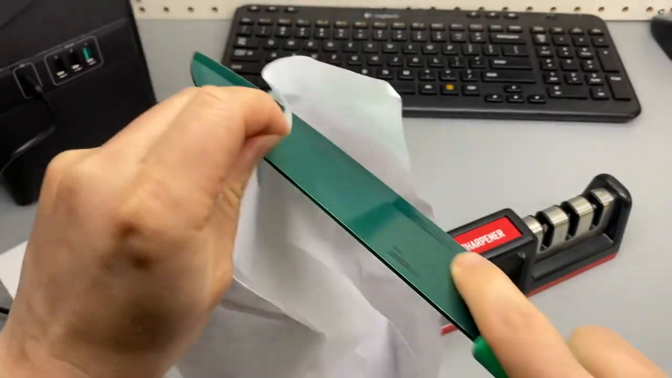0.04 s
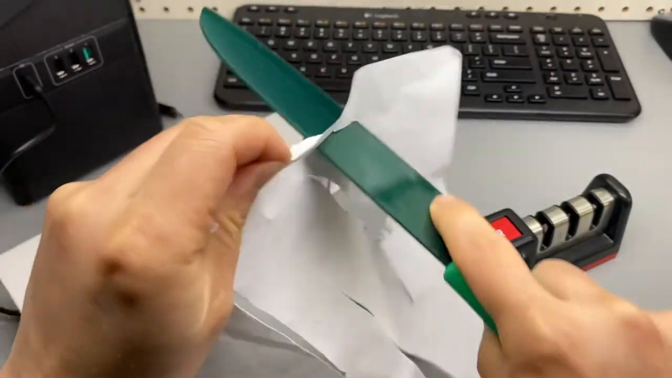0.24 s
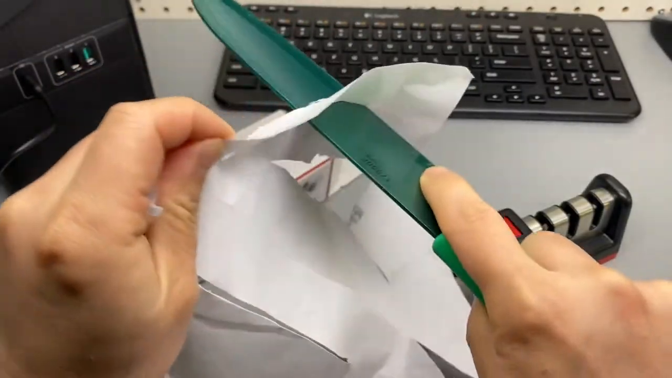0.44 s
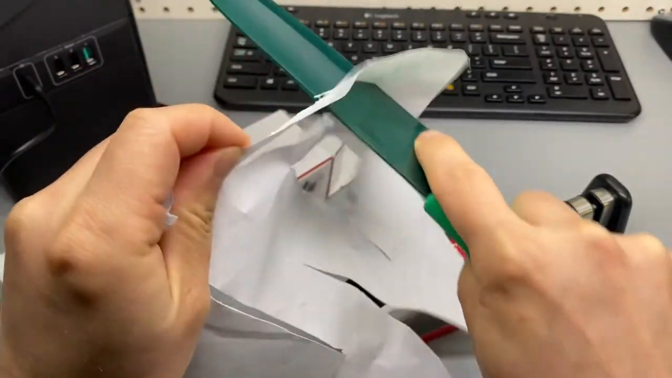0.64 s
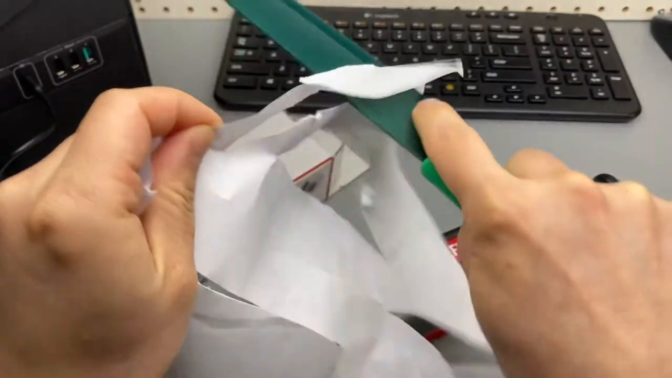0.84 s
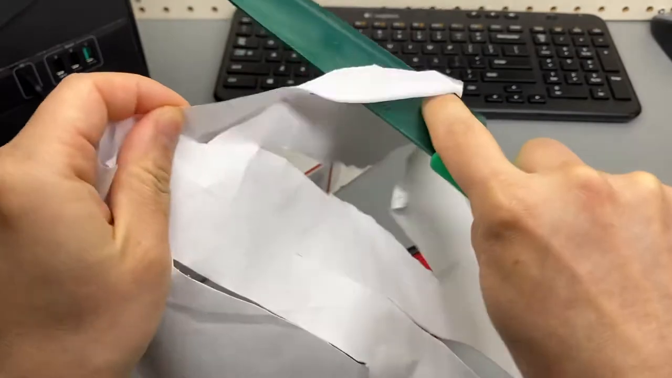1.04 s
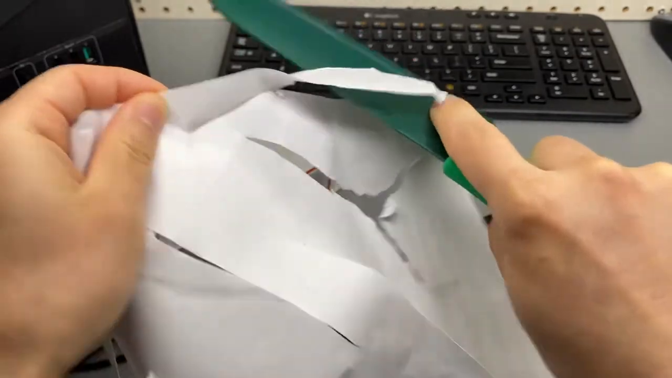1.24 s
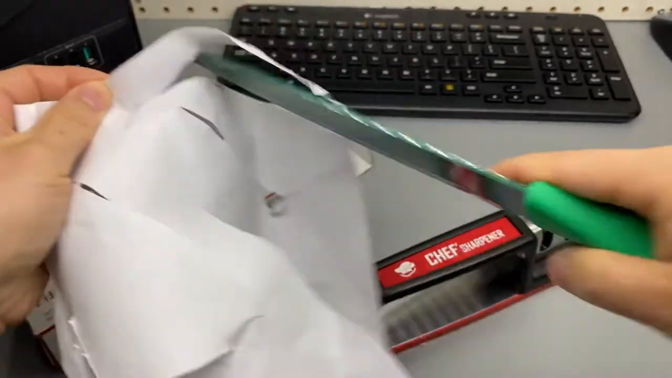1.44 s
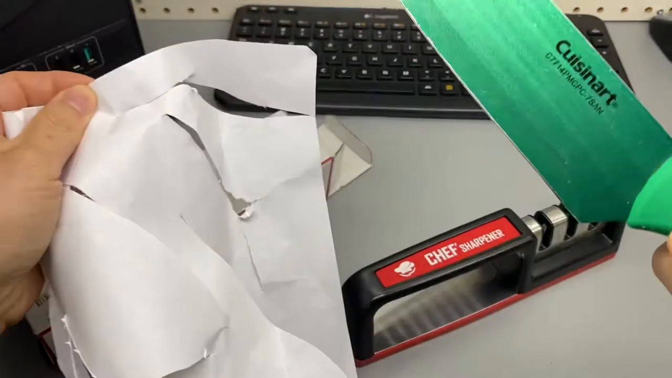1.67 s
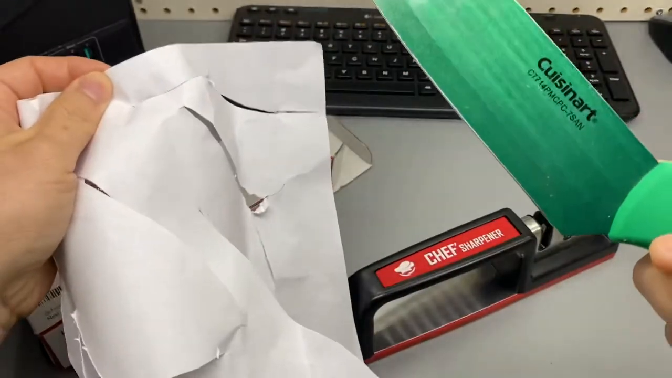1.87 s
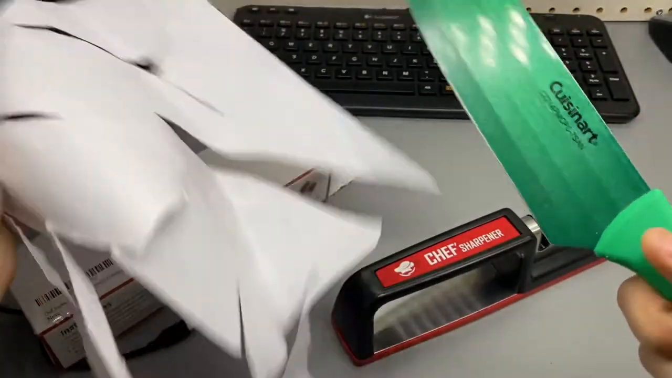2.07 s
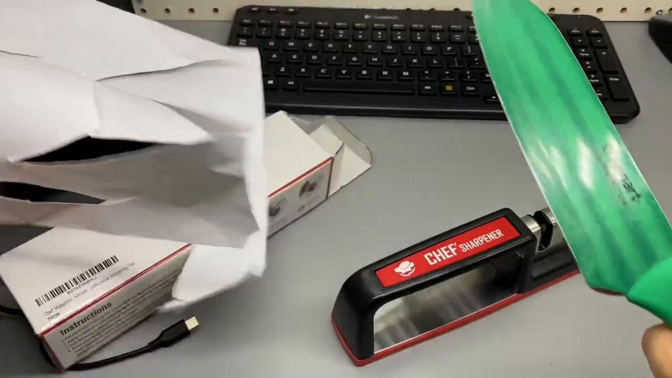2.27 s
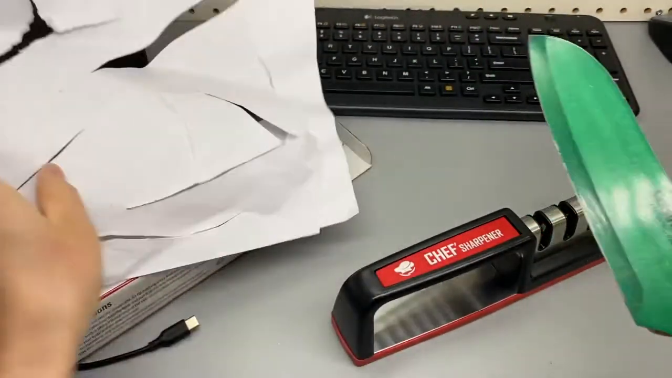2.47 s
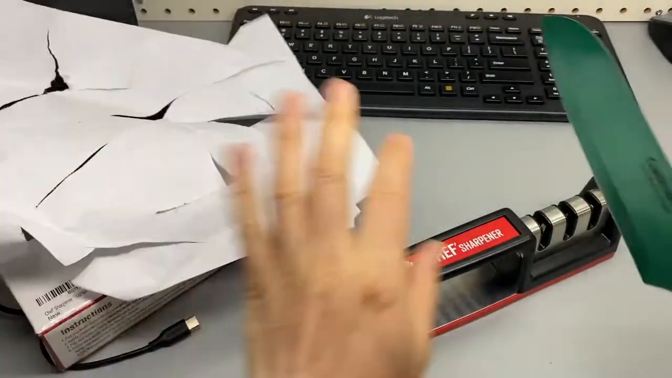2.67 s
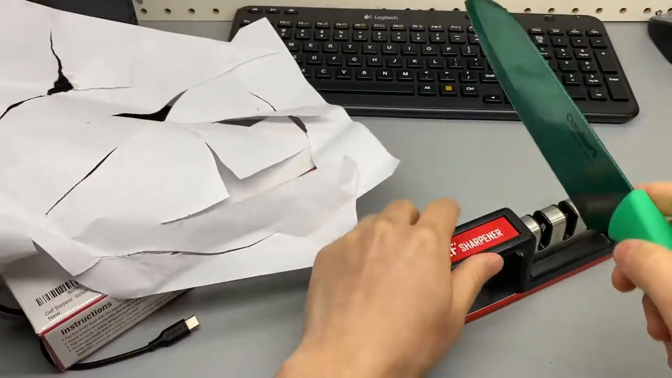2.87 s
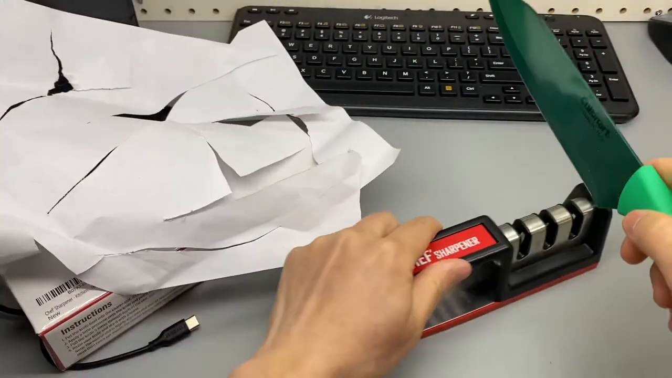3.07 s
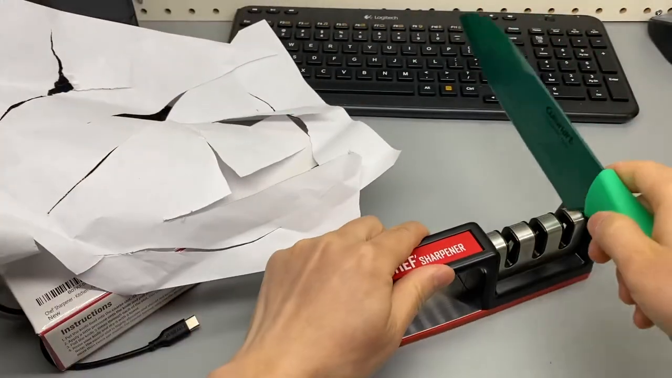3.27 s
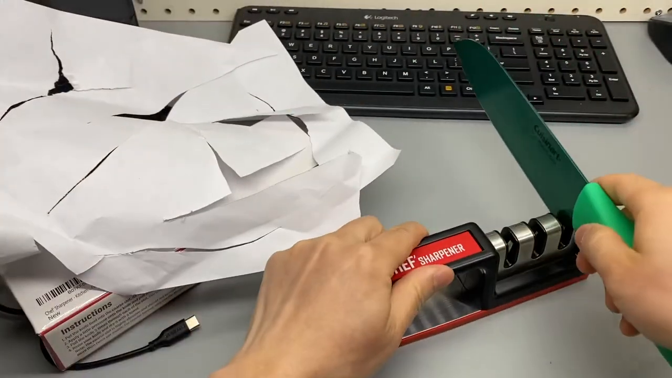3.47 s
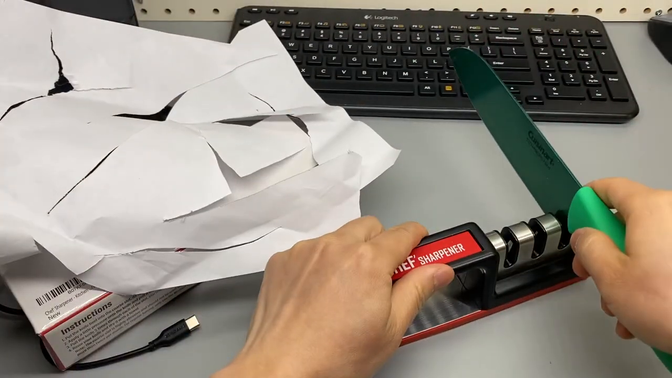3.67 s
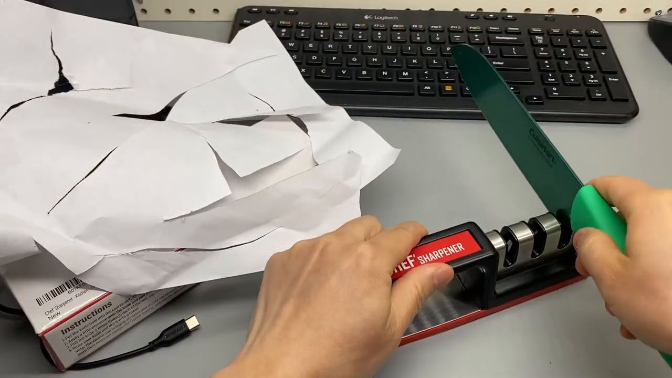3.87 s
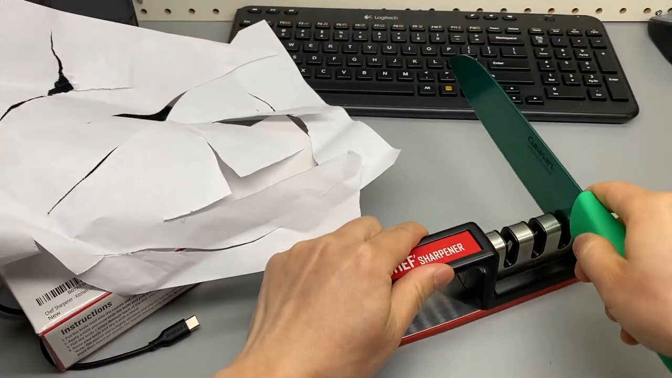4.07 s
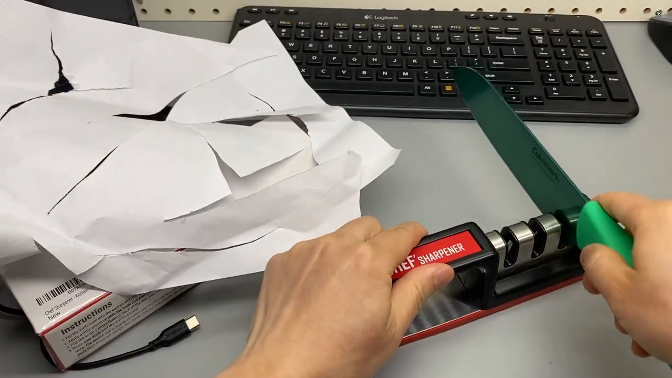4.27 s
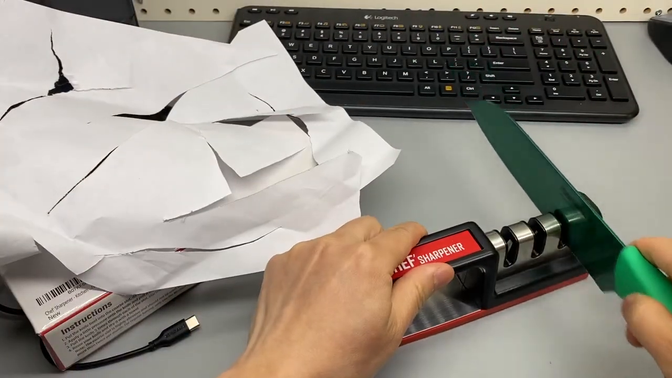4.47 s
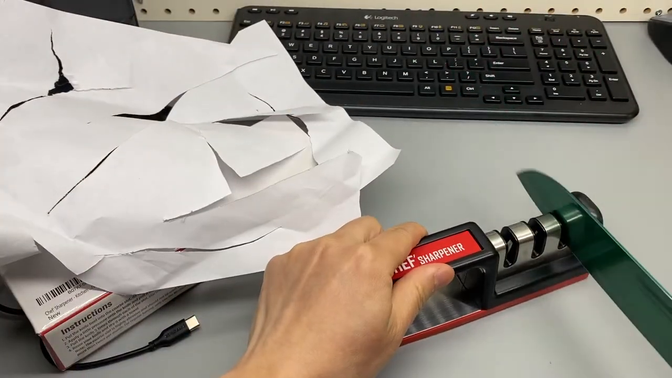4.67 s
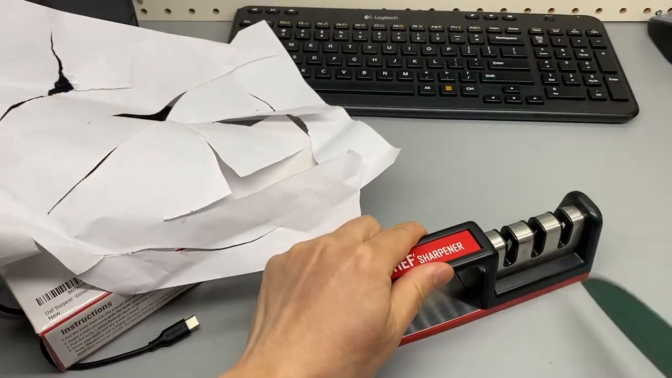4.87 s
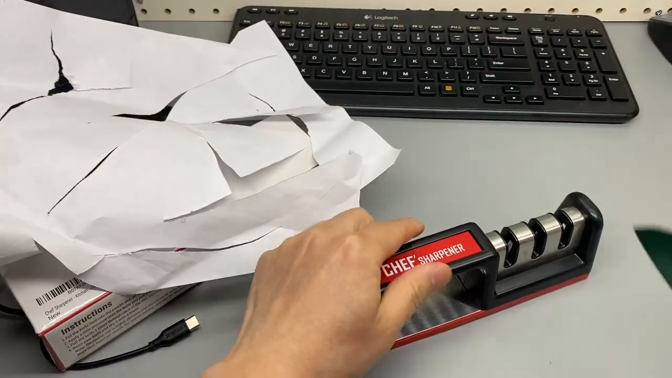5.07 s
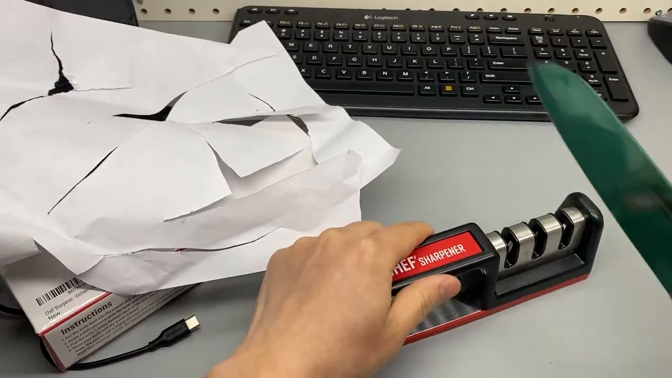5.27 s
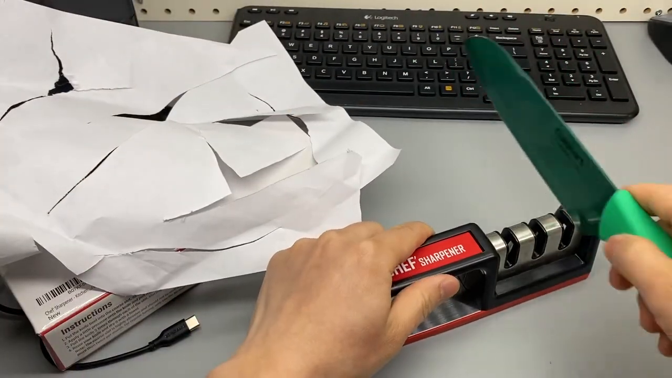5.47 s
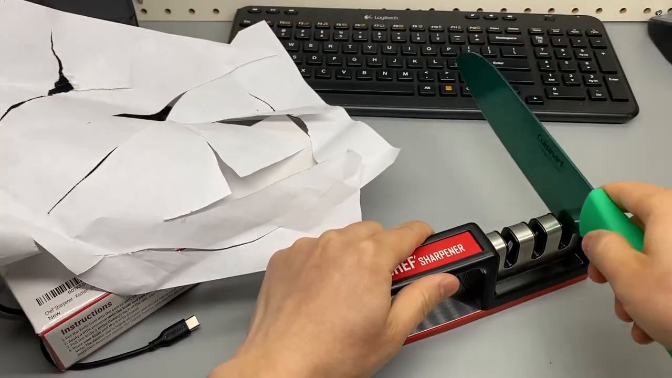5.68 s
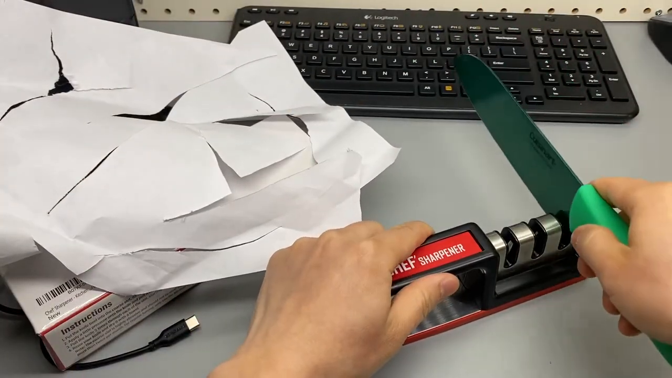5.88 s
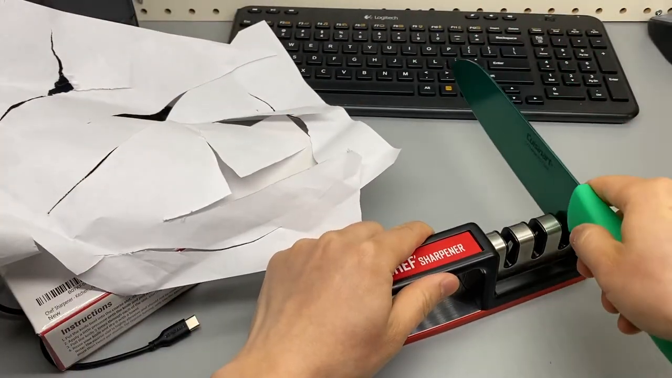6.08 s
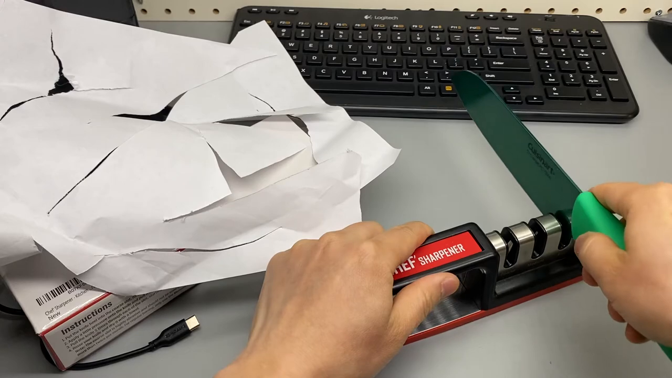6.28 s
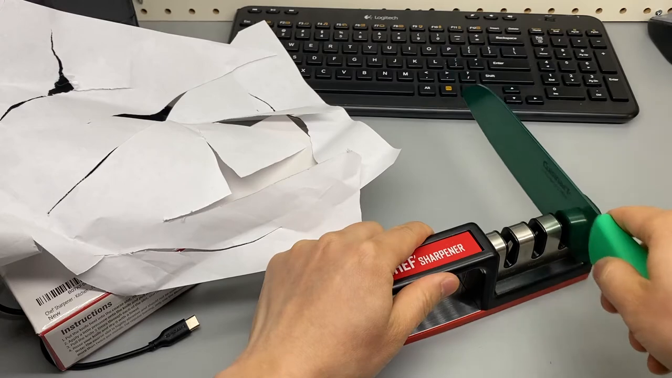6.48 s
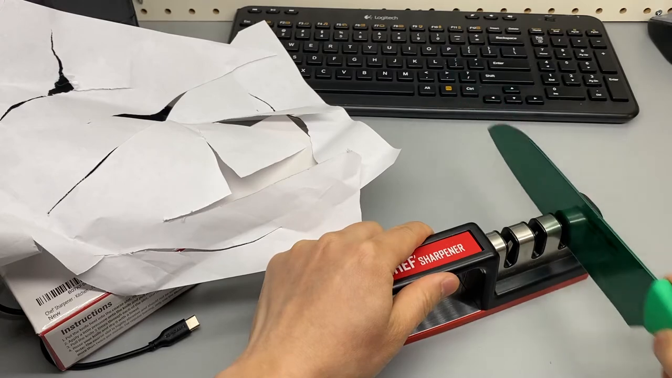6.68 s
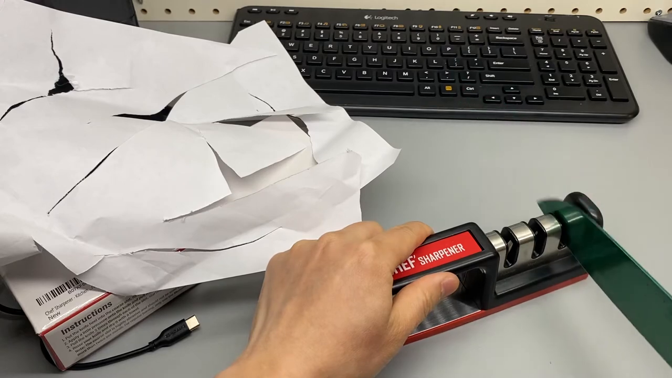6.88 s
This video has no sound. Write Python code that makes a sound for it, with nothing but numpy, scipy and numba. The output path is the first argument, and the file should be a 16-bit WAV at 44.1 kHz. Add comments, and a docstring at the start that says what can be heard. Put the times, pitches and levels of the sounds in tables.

```python
"""Close at hand, a kitchen knife slices a held sheet of paper in strokes of crackling fibres with sharp snaps.
The sheet drops on a cardboard box, which hums low; then a sharpener slides hissing over the desk into place.
The blade knocks into the slot and is drawn through; a light, dull tap sounds, and the blade is drawn through a
second time: random grit rings the steel, struck modes make the plastic housing clack and the desk boom. A small
room with steady, mostly low air noise, in mono."""
import sys
import numpy as np
from scipy import signal
from scipy.fft import rfft, irfft, next_fast_len
from scipy.io import wavfile
from scipy.ndimage import uniform_filter1d, map_coordinates
from numba import njit

SR = 44100
rng = np.random.default_rng(int(sys.argv[2]) if len(sys.argv) > 2 else 0)


def unload_audio(sound):
    """Save the sound as a 16-bit wav file, at the path given as the first command line argument."""
    columns = np.transpose(np.atleast_2d(sound))
    # keep every value between -1 and 1, then stretch to whole-number steps
    steps = np.round(np.clip(columns, -1, 1) * 32767)
    wavfile.write(sys.argv[1], SR, steps.astype(np.int16))


N = 305170
T = np.arange(N) / SR  # time [s]

# modes of the desk top: (frequency [Hz], t60 [s], level [dB])
DESK_MODES = [(98.4, 0.26, -5), (125.3, 0.095, 1.5), (169.6, 0.13, -7), (245.8, 0.25, -10),
              (414.5, 0.14, -10.5), (565, 0.058, -5)]
# resonances of the blade held in the slot: (frequency [Hz], width [Hz], relative level [dB])
BLADE_PEAKS = [(428, 30, 10.5), (526, 23, 4), (1110, 19, -53), (1830, 41, 19), (2075, 93, 10.5),
               (2444, 31, 11.5), (2880, 120, 5), (3584, 200, 7.5), (3730, 77, 9), (3900, 130, -3.5),
               (3740, 73.5, -2.5), (4070, 54, 9.5), (5400, 46, -4), (7150, 190, 1.5), (8290, 99, 3),
               (8800, 45, 1), (10630, 86, 1), (12500, 80, 5), (14200, 200, 2)]


def undb(db):
    """Decibels to gain."""
    return 10 ** (np.asarray(db) / 20)


def unit(x):
    """Scale to rms 1."""
    return x / np.sqrt(np.mean(x ** 2) + 1e-20)


def add(track, s, sound):
    """Mix a sound into a track at a time in seconds."""
    i = max(int(s * SR), 0)
    track[i:i + len(sound)] += sound[:N - i]


def controls(rows):
    """A gate that is open while the rows last, then each column as a curve."""
    s, *columns = np.transpose(rows)
    is_open = (T >= s[0]) & (T <= s[-1])
    gate = uniform_filter1d(is_open * 1., size=180)
    return [gate] + [np.interp(T, s, c) for c in columns]


def walk(rate):
    """Random wander with spread near 1, in straight lines between `rate` knots a second."""
    knots = rng.standard_normal(2000)
    return 1.2 * np.interp(T * rate, np.arange(len(knots)), knots)


def grains(rate, spread_db):
    """Random tiny impulses, `rate` a second; with a wider spread most are weak and a few strong."""
    size = undb(spread_db * np.minimum(rng.exponential(size=N), 4.5))
    struck = rng.random(N) < rate / SR
    return unit(struck * size * rng.choice([-1, 1], N))


def burst(t60, count=8000):
    """Noise that dies away by 60 dB in t60 seconds."""
    return rng.standard_normal(count) * undb(-60 * T[:count] / t60)


def ring(modes, count=16000):
    """Response of a struck body, one row a mode; neighbouring modes swing in opposite directions."""
    t = T[:count]
    return np.array([(-1) ** k * undb(db - 60 * t / t60) * np.sin(2 * np.pi * hz * t)
                     for k, (hz, t60, db) in enumerate(modes)])


def band(x, lo_hz, hi_hz):
    """Causal band-pass."""
    sos = signal.butter(3, [lo_hz, min(hi_hz, .48 * SR)], "band", fs=SR, output="sos")
    return signal.sosfilt(sos, x + 1e-18)


def colour(x, points, peaks=()):
    """Minimum-phase filter with a smooth spectrum and resonances standing on it."""
    size = 4096
    f = np.arange(size // 2 + 1) * SR / size + 1  # the 1 Hz keeps the logarithm finite
    hz, db = np.transpose(points)
    smooth = undb(np.interp(np.log(f), np.log(hz), db))
    power = 1 + sum(undb(2 * d) / (1 + (2 * (f - c) / w) ** 2) * 2 for c, w, d in peaks)
    # folding the cepstrum onto positive time makes the filter causal
    cepstrum = irfft(np.log(smooth * np.sqrt(power)))
    cepstrum[1:size // 2] *= 2
    cepstrum[size // 2 + 1:] = 0
    return signal.oaconvolve(x, irfft(np.exp(rfft(cepstrum))))[:len(x)]


@njit
def resonate(x, hz, q):
    """Band-pass whose centre moves, gain 1 at the centre."""
    y, b, l = np.empty(len(x)), 0., 0.  # b and l: states of the two integrators
    for i in range(len(x)):
        g = np.tan(np.pi * hz[i] / SR)
        v = (b + g * (x[i] - l)) / (1 + g * (g + 1 / q))
        b, l, y[i] = 2 * v - b, l + 2 * g * v, v / q
    return y


def flex(x, depth_db, rate):
    """Overlapping bands swell and fade on their own as the contact point moves."""
    size = next_fast_len(N, True)
    spectrum, f = rfft(x, size), np.arange(size // 2 + 1) * SR / size
    centres = np.geomspace(1200, 15000, 12)  # [Hz]
    out = np.zeros(N)
    for share in np.eye(len(centres)):
        part = irfft(spectrum * np.interp(f, centres, share), size)[:N]
        out += part * undb(depth_db * walk(rate))
    return out


def registers(x):
    """Body, middle and top of a sound, split near 1600 and 7000 Hz, each at rms 1."""
    size = next_fast_len(N, True)
    spectrum, f = rfft(x, size), np.arange(size // 2 + 1) * SR / size
    low, high = 1 / (1 + (f / 1600) ** 6), 1 / (1 + (f / 7000) ** 8)
    return [unit(irfft(spectrum * share, size)[:N]) for share in (low, high - low, 1 - high)]


def drift(x, share, rate_hz):
    """Let all resonances of a sound wander up and down together."""
    return map_coordinates(x, [np.cumsum(1 + share * walk(rate_hz))], order=3, mode="mirror")


def stroke(start, length, attack_s, release_s, swell_db=0):
    """Gain of one movement: it rises, holds while swelling or fading, and dies away."""
    held = np.clip((T - start) / max(length, .002), 0, 1) - .5
    # attack and release are the times to change by 60 dB
    outside = np.maximum(start - T, 0) / attack_s + np.maximum(T - start - length, 0) / release_s
    return undb(swell_db * held - 60 * np.minimum(outside, 3))


def strokes(rows, attack_s, release_s):
    """Power of body, middle and top for each movement of a table: rows x 3 x N."""
    powers = []
    for s, length, db, swell_db, body_db, top_db, *_ in rows:
        levels = undb([db + body_db, db, db + top_db])
        shape = stroke(s, length, attack_s, release_s, swell_db)
        powers.append(np.outer(levels ** 2, shape ** 2))
    return np.array(powers)


def air():
    """Steady room noise, mostly low, its level wandering slightly."""
    # colour of the room's air: (frequency [Hz], level [dB])
    air_colour = [(25, -19.5), (55, -3.5), (80, 3.5), (150, -10), (290, -8.5), (450, -13.5), (700, -18),
                  (1200, -22.5), (1570, -22), (2000, -23), (5000, -30.5), (12000, -36), (16000, -39.5)]
    level_db = -62.5 + .7 * walk(7.6)
    return undb(level_db) * unit(colour(rng.standard_normal(N), air_colour))


def room(x, early_db, tail_db, t60):
    """Desk and wall throw the sound back at once; a short, duller tail follows."""
    early, tail = np.zeros(N), np.zeros(N)
    add(early, .0015, burst(0.06))
    dull = [(60, 2.5), (300, 4.0), (2000, -3.5), (7000, -9.0), (16000, -9.0)]  # ([Hz], [dB])
    add(tail, .009, colour(burst(t60, count=20000), dull))
    response = undb(early_db) * early / np.linalg.norm(early) + undb(tail_db) * tail / np.linalg.norm(tail)
    return x + signal.oaconvolve(x, response[:SR // 2])[:N]


def jolts():
    """The sharpener's feet jolt the desk, whose modes boom; a harder jolt wakes the higher ones."""
    # jolts: (time [s], level [dB], hardness [dB] gained by a mode two octaves above the lowest)
    jolt_rows = [(3.004, -37, -8.5), (3.075, -39.5, -12), (3.16, -47, -10), (3.661, -33.5, -5),
                 (3.972, -24, -8), (4.203, -28.5, -6), (4.283, -28, -11), (4.578, -36.5, 0),
                 (4.835, -22, 3.5), (4.881, -33, -2), (5.035, -45, -5), (5.680, -48, 13),
                 (5.975, -24.5, 1.5), (6.284, -27, -9), (6.402, -30.5, -6), (6.532, -29, -21),
                 (6.706, -22.5, -8), (6.752, -31, -13)]
    out, modes, hz = np.zeros(N), ring(DESK_MODES), np.array(DESK_MODES)[:, 0]
    height = np.log(hz / hz[0]) / np.log(4) * (hz > 200)
    for s, db, hardness_db in jolt_rows:
        add(out, s, undb(db + hardness_db * height) @ modes)
    return out


def rumble(hardness_db, rate):
    """Rubber feet stick and slip: random pulses shake the desk's low modes most."""
    hz = np.array(DESK_MODES)[:, 0]
    boom = undb(hardness_db * (hz > 300)) @ ring(DESK_MODES)
    return unit(signal.oaconvolve(grains(rate, spread_db=0.0), boom)[:N])


def box():
    """The hollow box hums at one low, slightly wavering note as the settling sheet pumps its air."""
    # puffs of air: (time [s], length [s], level [dB])
    puffs = [(2.276, 0.071, -44), (2.432, 0.042, -41), (2.643, 0.018, -46.5), (2.71, .028, -46)]
    gain = sum(undb(db) * stroke(s, length, attack_s=.1, release_s=.11) for s, length, db in puffs)
    hz = 256 + 7 * walk(45)
    phase = 2 * np.pi * np.cumsum(hz) / SR
    return gain * undb(1.5 * walk(50)) * np.sin(phase)


def slide():
    """The sharpener hisses and judders across the desk top: coloured grains over stick-slip rumble."""
    # the slide: (time [s], hiss level [dB], rumble level before trim [dB])
    slide_rows = [(2.96, -61, -67), (2.98, -49.5, -63), (2.996, -48, -39), (3.03, -45, -46),
                  (3.222, -61, -51.5), (3.302, -83, -62.5), (3.35, -90.5, -82)]
    # colour of the hiss: (frequency [Hz], level [dB])
    hiss_colour = [(180, -59.5), (300, -32), (398, -10.5), (645, -24), (749, -7), (814, -14), (1780, -15.5),
                   (3640, -3), (4670, -10), (12500, -24), (16000, -28)]
    gate, hiss_db, rumble_db = controls(slide_rows)
    hiss = unit(colour(grains(rate=6600, spread_db=2.0), hiss_colour))
    judder = undb(rumble_db - 6.5) * rumble(hardness_db=-10, rate=35)
    return gate * (undb(hiss_db) * hiss + judder)


def snaps():
    """A crease gives way or the sheet slaps down: a sharp crack and a short flutter."""
    # snaps: (time [s], crack level before trim [dB], flutter level before trim [dB])
    snap_rows = [(.0074, -10.5, -44), (0.0631, -11, -24), (.0923, -4, -31), (.1407, -9, -37.5),
                 (.2508, -26, -20), (0.4703, -15.5, -40), (0.6498, -8, -30), (0.723, -11, -44),
                 (0.7785, -16.5, -45), (.7933, -10.5, -33), (.8184, 1, -30), (0.9589, -21, -34.5),
                 (1.0425, -7.5, -30), (1.0605, -11, -30), (1.0737, -3.5, -36), (1.2054, -34, -37.5),
                 (1.357, -22, -38), (1.4316, -13.5, -29.5), (1.9127, -46, -38.5), (1.9624, -34, -32.5),
                 (2.0242, -24, -50), (2.0712, -27, -31.5), (2.1169, -7, -34), (2.3265, -26, -30),
                 (2.419, -21, -20), (2.6254, -45, -41), (2.7876, -30, -43.5)]
    cracks, bodies = np.zeros(N), np.zeros(N)
    for s, crack_db, body_db in snap_rows:
        add(cracks, s, undb(crack_db - 15.0) * (burst(0.066) + 3.5 * burst(.007)))
        add(bodies, s, undb(body_db + 8.5) * (burst(.052) + 1.6 * burst(0.014)))
    flutter = [(60, -35), (170, -29.5), (400, -8.0), (720, 3.5), (900, -1), (1150, 0), (2400, -5.5),
               (5000, -24), (16000, -44)]  # (frequency [Hz], level [dB])
    return band(cracks, 2200, 14000) + colour(bodies, flutter)


def paper():
    """Fibres part in dense crackles, bundles in lone ticks; they ring the flap as the sheet bends."""
    # the edge bites and runs through the sheet: (time [s], length [s], tearing level before trim [dB],
    # swell over the cut [dB], relative body [dB], relative fibre hiss [dB], ring of the free flap [Hz])
    cut_rows = [ (0.0, 0.029, -31, -2, -4.5, 0.5, 2400), (0.095, 0.022, -23.5, -1, -7, -1, 3200),
                (0.14, 0.071, -17, -2, -7.5, -2.5, 2900), (0.227, 0.085, -24, -6.5, -5.5, -1, 2550),
                (0.324, 0.048, -30.5, 5.5, -5.5, -1.5, 7340), (0.484, 0.045, -26.5, 1.5, -2, -1.5, 7400),
                (0.596, 0.088, -25, 3, -8.5, -2.5, 3900), (0.687, 0.064, -34, -4.5, -9.5, 4, 3900),
                (0.798, .014, -30, 0.5, -13.5, 6.5, 7400), (0.822, .035, -20, 1, -9, 4.5, 7100),
                (0.865, .03, -18.5, -3.5, -11.5, -1.5, 4600), (1.053, 0.031, -24.5, 5, -5.5, 1, 7600),
                (1.362, 0.049, -35.5, -2.5, -2.5, -1.5, 5400), (1.43, 0.014, -28, -4, -9.5, -2.5, 5400), ]
    # the sheet slides on the blade, bends, settles or is brushed: (time [s], length [s],
    # level before trim [dB], swell [dB], relative body [dB], relative fibre hiss [dB])
    rustle_rows = [ (0.035, 0.047, -39.5, 3, -7, 0), (0.395, 0.05, -50.5, -3, 3, -5),
                   (0.566, 0.019, -37, 3, -8, -2), (0.912, 0.072, -42.5, 2.5, -6, 2.5),
                   (1.022, .026, -36.5, 6, -3, -1), (1.135, 0.092, -46.5, 2.5, -5.5, 1),
                   (1.245, 0.094, -43, -3, -1.5, 0.5), (1.455, 0.032, -41.5, -4.5, -7, 0),
                   (1.510, 0.14, -54.5, -0.5, -5, 1.5), (1.665, 0.093, -64, -2, -1.5, -5.5),
                   (1.79, .085, -66, 3, -1, -3), (1.880, .075, -61, 4.5, -3, 1),
                   (1.964, 0.078, -39, 6, -5.5, 2), (2.070, 0.077, -36.5, 4, -5, -4),
                   (2.160, 0.12, -44.5, -3, -2.5, 1.5), (2.280, 0.021, -38.5, -1.5, 3, -6.5),
                   (2.315, .095, -42, -5, 0, 1), (2.425, 0.049, -40.5, -2, 1, 0.5),
                   (2.495, 0.18, -51.5, -8, -1.5, 0.5), (2.668, 0.074, -47.5, 0.5, 1, 2.5),
                   (2.812, 0.034, -49.5, 0.5, -9, 7), (2.860, 0.087, -58.5, -5, -5, 0),
                   (5.005, 0.013, -58, 1, -7, -4.5), (5.035, .29, -70.5, -5.5, -2, -3.5),
                   (5.160, 0.084, -64.5, -1.5, -11, -1.5), ]
    # colour of the paper: (frequency [Hz], level [dB])
    paper_colour = [(35, -49), (60, -17.5), (118, -6.5), (408, -4), (566, -5), (666, -6.5), (732, -0.5),
                    (882, -6.5), (991, -3.5), (1510, -2.5), (3270, 0), (4220, -1.5), (6740, 1), (13600, -4),
                    (16000, -12.5)]
    # broad resonances of the held sheet: (frequency [Hz], width [Hz], relative level [dB])
    sheet_peaks = [(571, 47, 1), (776, 66, -4), (1010, 61, 4), (2623, 750, -6), (3150, 150, -12.5),
                   (3750, 300, -12)]
    slack_flap_hz, flap_q, flap_db = 4200, 4.7, -5.5  # the flap's ring between cuts, its sharpness and level
    cuts = strokes(cut_rows, attack_s=.065, release_s=0.063)
    rustle = strokes(rustle_rows, attack_s=0.059, release_s=0.054).sum(axis=0)
    power = cuts.sum(axis=0) + rustle
    # each cut pulls the flap taut at its own pitch
    flap_hz = (np.array(cut_rows)[:, -1] @ cuts[:, 1] + slack_flap_hz * rustle[1]) / power[1]
    fibres = grains(rate=4000, spread_db=3.0) * undb(1.8 * walk(170))
    bundles = .45 * grains(rate=420, spread_db=2.6)
    # the loose sheet adds lone ticks of its own
    looseness = 0.53 * rustle[1] / power[1]
    crinkles = looseness * grains(rate=300, spread_db=0.75)
    crackle = (fibres + bundles + crinkles) / np.hypot(1, looseness)
    sheet = colour(crackle, paper_colour, sheet_peaks)
    flap = undb(flap_db) * resonate(sheet, flap_hz, flap_q)
    body, tear, hiss = registers(flex(sheet + flap, depth_db=2., rate=65))
    body_gain, tear_gain, hiss_gain = np.sqrt(power)
    return undb(-2.0) * body_gain * body + undb(-1.58) * tear_gain * tear + undb(-1.36) * hiss_gain * hiss


def tap():
    """A light, dull tap with a tick on top and a lingering ring while the knife is lifted."""
    # the tap: (time [s], level before trim [dB], t60 of its noise [s])
    tap_row = (5.366, -44.5, 0.36)
    # what the tap rings with: (frequency [Hz], t60 [s], relative level [dB])
    tap_modes = [(364, 0.33, -11), (680, 0.2, -1.5), (754, .27, -8), (1585, .8, -19), (1680, .28, -14)]
    s, db, t60 = tap_row
    knock, ringing = np.zeros((2, N))
    add(knock, s, undb(db) * (burst(t60, count=14000) + 1.5 * burst(0.026, count=14000)))
    add(ringing, s, undb(db - 2.5) * ring(tap_modes).sum(axis=0))
    dull = [(100, -12), (300, 6.5), (700, 7.5), (1100, 1.5), (1600, 5.5), (3000, -4), (6000, -10.5),
            (16000, -19)]  # (frequency [Hz], level [dB])
    return ringing + colour(knock, dull)


def knocks():
    """Steel clicks against the slot; the plastic housing clacks and rattles briefly."""
    # knocks: (time [s], steel click before trim [dB], housing clack before trim [dB],
    # edge brightness relative to the click [dB])
    knock_rows = [(3.431, -41, -41, -18), (3.6313, -24.5, -43.5, 0), (3.6528, -20.5, -37, 0),
                  (3.8920, -20.5, -43.5, -1), (3.9668, -15.5, -39, -2.5), (4.369, -21.5, -57, 5),
                  (4.575, -24.5, -38.5, 5), (4.8299, -21, -27.5, -7), (5.005, -38.5, -54, 3.5),
                  (5.6766, -28, -40.5, -13), (5.7394, -25.5, -49, -10.5), (5.882, -31, -46, 10),
                  (5.97, -20.5, -34, 1.5), (6.084, -21, -55, -0.5), (6.694, -32, -37, 9)]
    # modes of the plastic housing: (frequency [Hz], t60 [s], level before the tilt below [dB])
    housing_modes = [(424.4, 0.088, -1.5), (567, 0.12, -7), (723, 0.022, -3), (808, 0.078, -4.5),
                     (978, 0.055, -7.5), (1097, 0.052, -0.5), (1296, 0.022, 0), (1504, 0.096, -8),
                     (1785, 0.36, -43), (1930, 0.069, -14.5), (2000, 0.022, -8), (2650, 0.025, -19)]
    heavy_db, deep_hz = -32.5, 750  # a clack above this level favours the modes below this frequency
    clicks, edges, clacks, rattles = np.zeros((4, N))
    modes = ring(housing_modes, count=9000)
    deep = np.maximum(np.log2(deep_hz / np.array(housing_modes)[:, 0]), 0)  # octaves
    for s, click_db, clack_db, bright_db in knock_rows:
        click = undb(click_db - 14) * (burst(0.034) + 0.92 * burst(0.004))
        add(clicks, s, click)
        add(edges, s, undb(bright_db) * click)
        # the heavier the blow, the more it wakes the deep modes
        body = undb(0.98 * (clack_db - heavy_db) * deep) @ modes
        chatter = burst(0.027, count=600)
        add(clacks, s, undb(clack_db) * signal.oaconvolve(body, chatter / np.linalg.norm(chatter)))
        add(rattles, s, undb(clack_db) * burst(0.1))
    # colours: (frequency [Hz], level [dB])
    click_colour = [(200, 3.5), (900, -27), (3000, 2.5), (4200, 1.0), (5500, -1), (9000, -24), (16000, -52)]
    edge_colour = [(1000, -47), (4000, -12), (6000, 1.5), (9000, 2.0), (13000, 3), (16000, -1)]
    rattle_colour = [(100, -17.0), (300, 4.5), (550, 3.0), (900, 4.5), (1700, -12), (3000, -4),
                     (6000, -21.5), (16000, -41.0)]
    steel = colour(clicks, click_colour, BLADE_PEAKS)
    edge = colour(edges, edge_colour, BLADE_PEAKS)
    rattle = undb(6.0) * colour(rattles, rattle_colour)
    return steel + edge + clacks + rattle


def squeaks():
    """Stick-slip locks onto a resonance: under light pressure the parts sing in a narrow, wavering band."""
    # squeaks: (start [s], end [s], frequency [Hz], phase wander setting [Hz], level before trim [dB])
    squeak_rows = [(2.965, 3.003, 3150, 350, -46.5), (3.696, 3.79, 3870, 550, -57),
                   (4.7, 4.78, 926, 25.1, -51), (5.75, 5.857, 3870, 555, -56.5),
                   (5.863, 5.897, 3850, 604, -38.5), (6.826, 6.913, 960, 25, -48.5)]
    out = np.zeros(N)
    for start, end, hz, wander_hz, db in squeak_rows:
        swell = np.sin(np.linspace(0, np.pi, max(int((end - start) * SR), 2)))
        # the phase drifts at random, which widens the line
        wobble = uniform_filter1d(rng.standard_normal(N // 10), size=40)
        phase = np.cumsum(2 * np.pi * hz / SR + np.sqrt(np.pi * wander_hz / SR) * wobble)
        add(out, start, undb(db + 1.5) * swell * np.sin(phase[:len(swell)]))
    return out


def scrape():
    """Abrasive grit plucks the edge and now and then catches; blade and housing ring, the drag shakes the desk."""
    # colour of the grit: (frequency [Hz], level [dB])
    grit_colour = [(180, -27.5), (300, 1), (486, 0), (537, -0.5), (667, -1.5), (961, 5.5), (1580, -8.5),
                   (1900, -16), (2250, -11.5), (3700, -6.5), (5080, -5.5), (14700, -17), (16000, -18)]
    # the edge grazes the slot as it goes in or slips out: (time [s], length [s], level [dB],
    # swell [dB], relative housing before trim [dB], relative fine grit [dB])
    graze_rows = [(3.635, .018, -48, -3, -3, -7), (3.722, 0.047, -54.5, 1, -1.5, -4),
                  (3.895, 0.058, -48, -1, 0, 1), (4.797, 0.035, -44, 5, 0, -0.5),
                  (5.742, 0.034, -50, -8.5, -1.5, -4), (5.829, 0.015, -53, -4, -13, -0.5),
                  (5.863, 0.022, -47.5, 4, -6.5, -2), (5.959, .015, -46.5, 4, 5.5, -9)]
    # the blade is drawn through the slot: (time [s], length [s], time the light tip takes over [s],
    # drag on the desk before the tip [dB])
    pull_rows = [(4.1, 0.718, 4.62, -47), (6.026, .89, 6.79, -43.5)]
    # pressure on the edge, one list a pull: (time [s], scrape level before trim [dB])
    pressure_curves = [
        [(4.08, -65.5), (4.192, -45.5), (4.504, -44.5), (4.556, -45), (4.574, -38), (4.6, -45.5),
         (4.758, -42.5), (4.83, -37.5)],
        [(6.02, -60), (6.076, -58.5), (6.086, -44.5), (6.116, -53.5), (6.256, -55), (6.264, -45), (6.42, -47.5),
         (6.92, -40)],
    ]
    housing_db, rasp_db, fine_db = -9.5, -2, -3  # trims while the heel is in the slot
    tip_housing_db, tip_fine_db, tip_desk_db = -6, -4, -11  # change once only the tip is in the slot
    grit = grains(rate=7000, spread_db=0.5) * undb(2.0 * walk(110))
    catches = .4 * grains(rate=220, spread_db=2.5)
    # the blade's resonances wander as the contact shifts
    blade = drift(colour(grit + catches, grit_colour, BLADE_PEAKS), share=.018, rate_hz=13)
    housing, rasp, fine = registers(flex(blade, depth_db=1.8, rate=35))
    desk = rumble(hardness_db=-7.5, rate=900)
    grazing = np.sqrt(strokes(graze_rows, attack_s=0.0083, release_s=0.098).sum(axis=0))
    out = (grazing * [undb(-2.5) * housing, rasp, fine]).sum(axis=0)
    for (s, length, tip_s, drag_db), pressure in zip(pull_rows, pressure_curves):
        # the thin tip drives housing and desk far less than the heel of the blade
        tip = np.clip((T - tip_s) / 0.02, 0, 1)
        steel = undb(housing_db + tip_housing_db * tip) * housing
        steel = steel + undb(rasp_db) * rasp + undb(fine_db + tip_fine_db * tip) * fine
        drag = undb(drag_db + tip_desk_db * tip) * desk
        press = undb(np.interp(T, *np.transpose(pressure)))
        out = out + stroke(s, length, attack_s=0.061, release_s=0.045) * (press * steel + drag)
    return out


def scene():
    """Paper, then sharpener, at arm's length on a desk; the same signal on both channels."""
    near = paper() + snaps() + box() + slide() + scrape() + squeaks() + knocks() + tap()
    mono = room(near, early_db=-8.5, tail_db=-17, t60=0.41) + jolts() + air()
    return np.array([mono, mono])


def record(dry):
    """The microphone rounds the loudest cracks and loses the deep bass; the recorder cuts the top."""
    rounded = .8 * np.tanh(dry / .8)
    thin = signal.sosfilt(signal.butter(4, 42, "high", fs=SR, output="sos"), rounded)
    return signal.sosfilt(signal.ellip(10, .2, 80, 15900, fs=SR, output="sos"), thin)


dry = scene()
out = record(dry)
unload_audio(out)
```